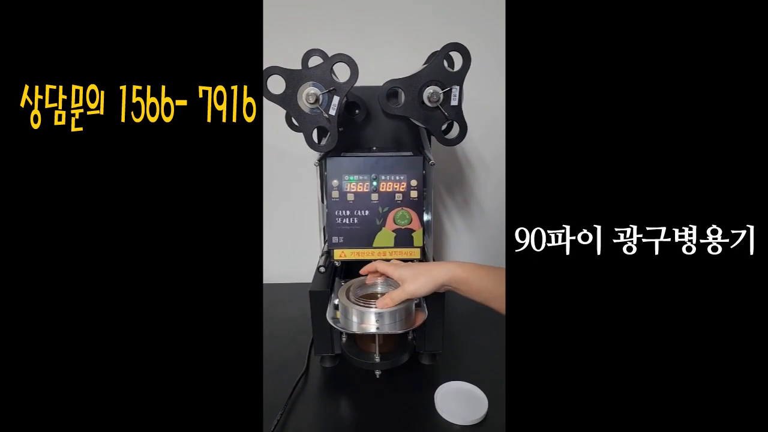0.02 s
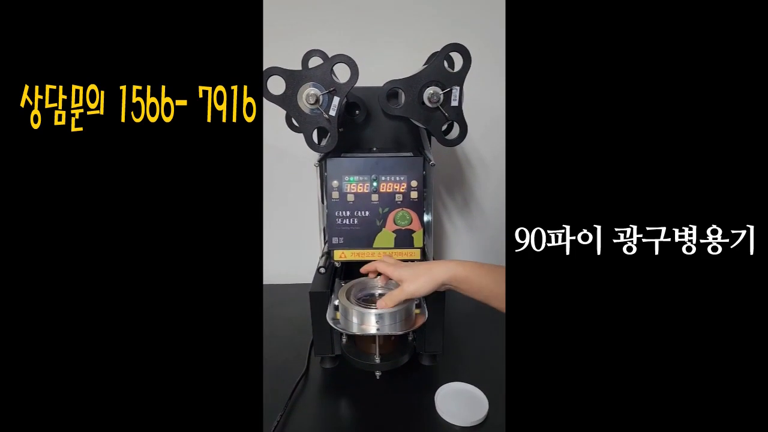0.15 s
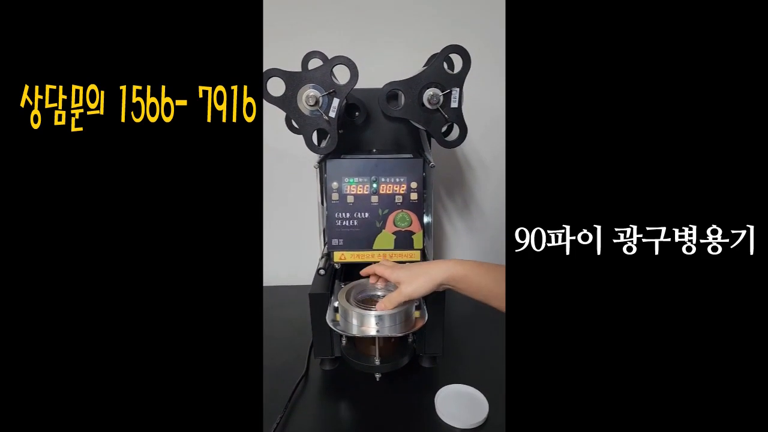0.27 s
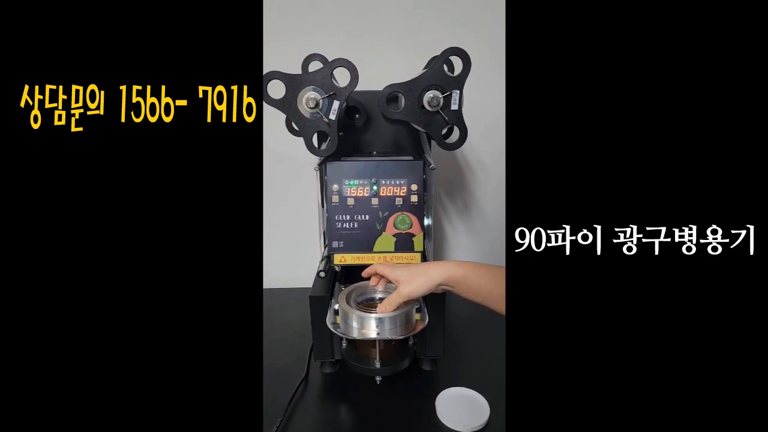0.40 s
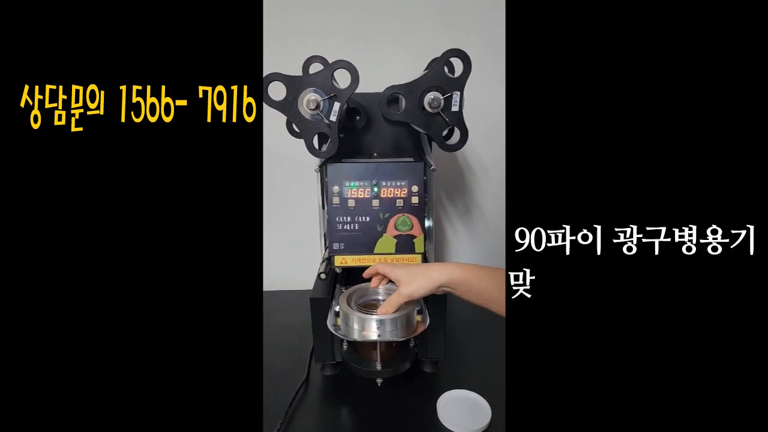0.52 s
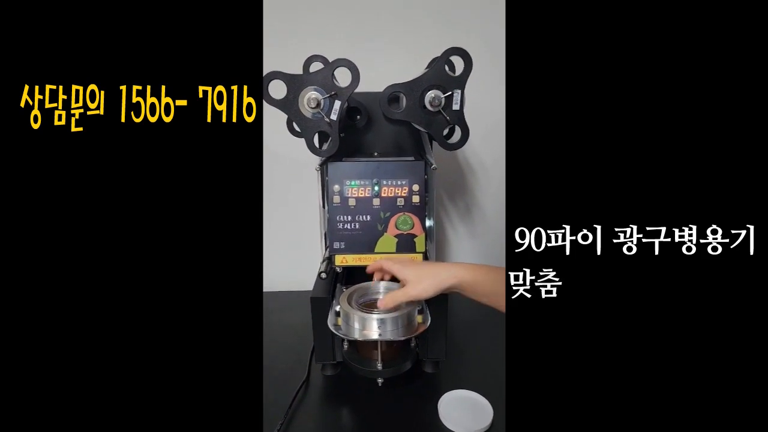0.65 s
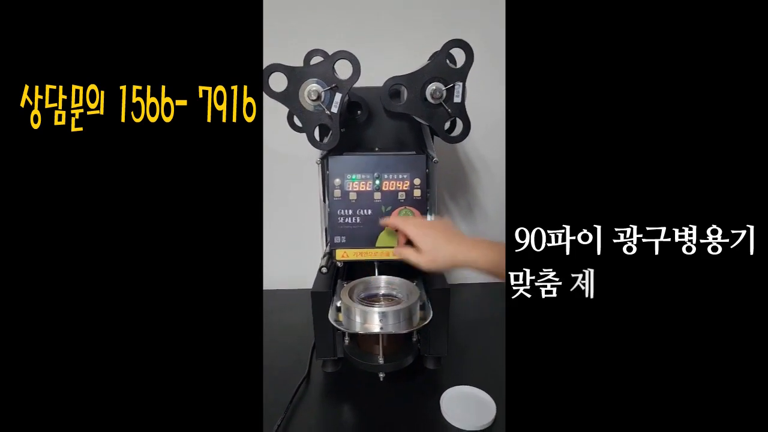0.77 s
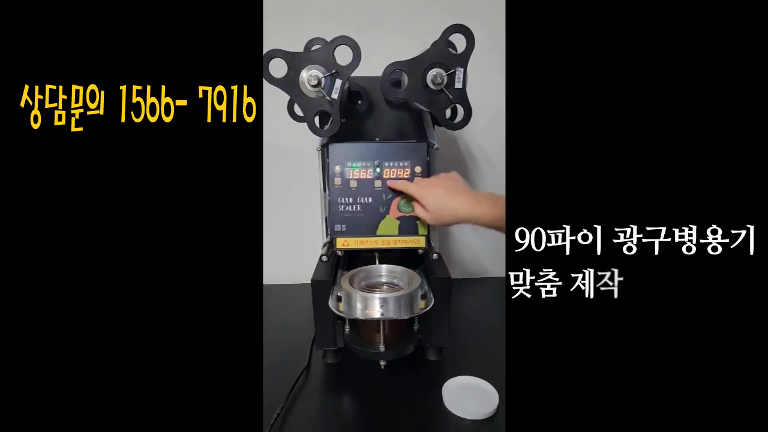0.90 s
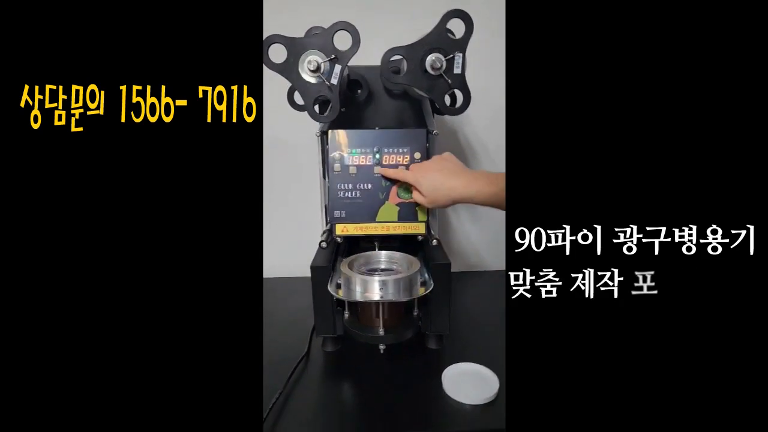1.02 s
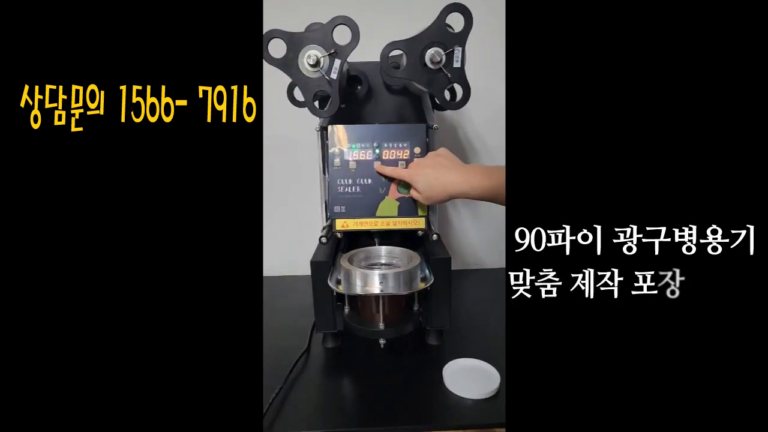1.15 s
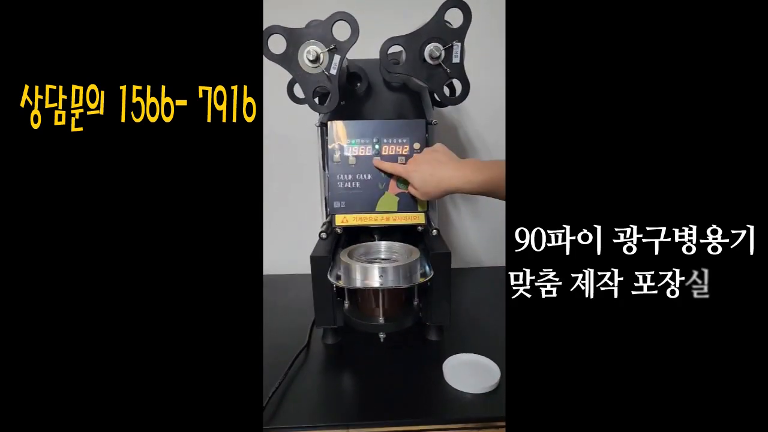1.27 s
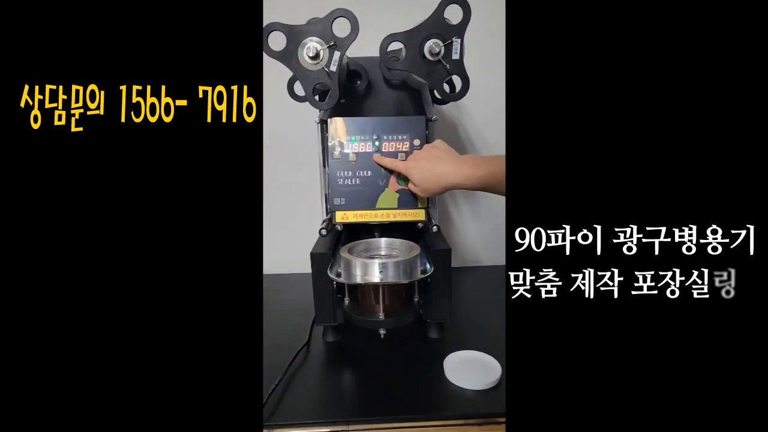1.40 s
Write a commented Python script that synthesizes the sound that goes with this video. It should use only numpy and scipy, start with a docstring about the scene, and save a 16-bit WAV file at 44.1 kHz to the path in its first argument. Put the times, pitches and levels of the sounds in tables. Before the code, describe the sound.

A jar clacks into a sealing machine's metal ring, followed by a soft rubbing hiss.

```python
"""A small room with a low hum, heard from a camera's stereo microphone by a tabletop sealing machine.
A jar is pushed into the machine's metal ring: a short scrape, a clattering clack and a thud that
leaves the frame ringing. Then a fine friction hiss swells close to the right microphone port,
probably a hand sliding on the camera body, with one dull tick."""
import sys
import numpy as np
from scipy import signal
from scipy.fft import rfft, irfft, next_fast_len
from scipy.io import wavfile
from scipy.ndimage import uniform_filter1d, map_coordinates

SR = 44100
rng = np.random.default_rng(int(sys.argv[2]) if len(sys.argv) > 2 else 0)


def inscribe(sig):
    """Save sig as 16-bit PCM at rate SR to the path in sys.argv[1].

    A 1-D sig is mono; a 2-D sig holds one channel per row.
    Samples are clipped to [-1, 1] before scaling.
    """
    pcm = np.round(np.clip(np.atleast_2d(sig).T, -1, 1) * 32767)
    wavfile.write(sys.argv[1], SR, pcm.astype(np.int16))


N = 63945

# noise of the jar striking or rubbing: f/Hz, relative level/dB
CONTACT_SPECTRUM = [(150, -15), (400, -1), (800, -2), (1550, 0), (1950, -6.5), (2700, 0), (4400, -2.5),
                    (6000, -6), (9000, -11.5), (13800, -10.5), (15000, -32)]
# likeness of left and right for sound from the room: f/Hz, correlation
ROOM_CORRELATION = [(250, 0.63), (600, 0.91), (1200, 0.13), (8000, 0.07)]


def jar_clack(crack_t60_s=0.031, crack_rise_s=0.0013):
    """The jar scrapes in and chatters against the ring; each contact cracks and rings the metal."""
    scrape = [(.184, -75), (.192, -51), (.205, -39.5), (.217, -33), (.232, -30.5), (.25, -49), (.3, -53),
              (.34, -72)]  # friction before the jar seats: t/s, relative level/dB
    contacts = [(.207, -39), (0.2206, -24), (.2255, -23), (.229, -23.5), (0.2354, -24.5), (.24, -35),
                (0.258, -31.5), (0.299, -46), (.316, -51)]  # jar against ring: t/s, relative level/dB
    ring_modes = [(716, -6, .2), (785, -5, .1), (895, -5, .2), (1196, 2, .16), (1326, -4, .15),
                  (1450, -6, .12), (1669, -7, .13), (2604, -5, .12), (3000, -4, .13), (3141, -2, .16),
                  (3310, -2, .13), (3502, -1, .17), (3654, -4, .14), (3790, -2, .14), (3949, -4, .14),
                  (4215, -1, .14), (4445, -2, .16)]  # the metal ring: f/Hz, relative level/dB, t60/s
    scraping = (since(scrape[0][0]) > 0) * (since(scrape[-1][0]) == 0)
    friction = level(scrape) * amp(1.9 * wobble(400)) * scraping
    crunch = stereo_noise(CONTACT_SPECTRUM, ROOM_CORRELATION) * friction
    metal = np.zeros((2, N))
    for start, db in contacts:
        t = since(start)
        crack = amp(db + 2 - 60 * t / crack_t60_s) * swell(t, crack_rise_s)
        crunch += stereo_noise(CONTACT_SPECTRUM, ROOM_CORRELATION) * crack
        for port in range(2):
            metal[port] += amp(db - 13) * ringing(ring_modes, t, scatter_db=2, scatter_turns=1)
    body = amp(-0.5) * crunch + amp(-1.5) * cabinet(crunch)
    return body + metal + amp(-7) * room(body + amp(-8.5) * metal)


def cabinet(x, t60_s=0.066):
    """The steel cabinet's dense, short modes colour every contact alike."""
    return reverberate(x, rng.standard_normal((2, N)) * amp(-60 * since(0) / t60_s))


def frame_thud(rise_s=0.0052):
    """The jar lands and settles; the machine's frame booms and one low mode rings on."""
    landings = [(0.097, -45), (.206, -33), (.2295, -16.5), (.256, -26.5), (.343, -33.5)]  # the jar's weight on the frame: t/s, relative level/dB
    frame_modes = [(61.3, -15, 0.37), (193.8, -6, 0.11), (204.4, -1.5, .13), (240.9, -6.5, 0.33),
                   (258.9, -25.5, 2.29), (318, -13.5, 0.14), (396, -19, 0.23), (422.4, -11.5, 0.2),
                   (479.3, -24.5, 0.39), (605.6, -15, 0.099)]  # the frame: f/Hz, relative level/dB, t60/s
    boom = sum(amp(db) * ringing(frame_modes, since(start)) * swell(since(start), rise_s)
               for start, db in landings)
    direct = high_pass(boom, hz=46)
    return direct + amp(-19.5) * room(direct)


def finger_touches(rise_s=0.0055, rub_t60_s=0.18):
    """Fingers shift the jar: a soft rub and a thin ring of glass."""
    touches = [(0.052, -66.5), (0.079, -69), (0.499, -68.5)]  # light touches: t/s, relative level/dB
    glass_modes = [(1520, -4, 0.18), (2670, -2, 0.14), (3000, -20, 0.18)]  # the jar: f/Hz, relative level/dB, t60/s
    out = np.zeros((2, N))
    for start, db in touches:
        t = since(start)
        rub = stereo_noise(CONTACT_SPECTRUM, ROOM_CORRELATION) * amp(5 - 60 * t / rub_t60_s)
        glass = ringing(glass_modes, t, scatter_db=2, scatter_turns=0.73)
        out += amp(db) * swell(t, rise_s) * (rub + glass)
    return out


def hand_slide(shift_middle_s=0.97, shift_length_s=0.62):
    """Friction hiss close to the right port changes colour as it passes, over a low handling rumble."""
    strength = [(0.479, -104, -76), (.588, -65.5, -67), (.682, -54, -52), (.806, -46, -44.5),
                (.87, -42, -43.5), (.98, -42.5, -40.5), (1.1, -40.5, -38), (1.226, -45.5, -44.5),
                (1.33, -43, -42.5), (1.45, -46.5, -46)]  # the hiss: t/s, relative level/dB right, relative level/dB left
    # hiss at the right port early and late, and at the left port: f/Hz, relative level/dB
    early_spectrum = [(60, -11), (600, -3), (1000, -8), (1650, -13.5), (2200, -8), (3000, -3.5),
                      (4100, -10.5), (5000, -6), (7000, -7), (9000, -4.5), (11700, 0.5), (13300, -1.5),
                      (14700, -4), (15400, -7)]
    late_spectrum = [(60, -10.5), (600, -4), (1300, -9), (2600, -3.5), (3800, -7), (5400, -8.5),
                     (6400, -18), (7300, -10), (8750, -2), (9400, -6), (11300, 1.5), (12200, 2.5),
                     (14000, -5), (14850, -5.5), (15350, -8)]
    left_spectrum = [(60, 5), (300, -4), (700, -1), (1750, -10), (3000, -3.5), (4800, -1.5), (5400, -0.5),
                     (7200, 1.5), (8050, -3.5), (8700, -4.5), (12000, 0.5), (15400, -3)]
    rumble_spectrum = [(25, -22), (42, -16), (58, 6.5), (85, -16), (120, 2.5), (160, -6), (220, -5),
                       (330, -22), (900, -42)]  # handling noise: f/Hz, relative level/dB
    rumble_levels = [(.62, -59), (.74, -51), (.86, -46), (.96, -58.5), (1.11, -44), (1.24, -51.5),
                     (1.33, -45.5), (1.45, -50)]  # handling noise at the right port: t/s, level/dB
    times, right_db, left_db = np.transpose(strength)
    shift = np.clip((since(0) - shift_middle_s) / shift_length_s + .5, 0, 1) * np.pi / 2
    right = np.cos(shift) * noise(early_spectrum) + np.sin(shift) * noise(late_spectrum)
    right *= level(np.c_[times, right_db + 4.5])
    left = noise(left_spectrum) * level(np.c_[times, left_db - 9])
    hiss = patchy(np.array([left, right])) * amp(0.57 * wobble(120))
    rumble = stereo_noise(rumble_spectrum, correlation=[(100, 0.52)]) * amp([[-8], [0]])
    return hiss + level(rumble_levels) * rumble


def camera_tick(low_cut_hz=336, buzz_t60_s=.085, left_db=-45):
    """A hollow tick bumps and rattles briefly in the camera body, just beside the right port."""
    ticks = [(.8517, -20.5), (.8566, -35)]  # the tick and its rattle: t/s, relative level/dB
    # modes of the camera body, and the soft bump under them: f/Hz, relative level/dB, t60/s
    case_modes = [(520, -4, .02), (736, -3.5, 0.013), (1200, 3.5, 0.0044), (1840, -20, 0.0065)]
    bump_modes = [(165, -24, .07)]
    buzz_spectrum = [(300, -35), (480, -2), (1000, -6), (1900, -4), (2800, -20), (6000, -49)]  # the rough tail: f/Hz, relative level/dB
    knock = sum(amp(db) * ringing(case_modes, since(start)) for start, db in ticks)
    knock = high_pass(high_pass(knock, low_cut_hz), low_cut_hz)
    start, db = ticks[0]
    t = since(start)
    buzz = noise(buzz_spectrum) * amp(db - 17 - 60 * t / buzz_t60_s) * (t > 0)
    bump = amp(db) * ringing(bump_modes, t)
    return (knock + buzz + bump) * amp([[left_db], [0]])


def room(x, build_s=.005):
    """The small room's reverberation builds quickly and its treble dies first."""
    decay_times = [(200, 0.78), (1000, 0.38), (3500, .36), (7000, 0.27), (14000, 0.21)]  # reverberation: f/Hz, t60/s
    hz, t, bands = signal.stft(rng.standard_normal((2, N)), SR, nperseg=256)
    decay = amp(-60 * t / along(decay_times, hz)[:, None])
    tail = signal.istft(bands * decay, SR, nperseg=256)[1][:, :N]
    return reverberate(x, spread(tail, ROOM_CORRELATION) * swell(since(0), build_s))


def room_tone(air_db=-58.5):
    """A low hum wavers in quiet room air."""
    hum_tones = [(60.5, -67), (117.5, -59)]  # the hum: f/Hz, median rms level/dB
    air_spectrum = [(25, -10), (60, -4), (90, -0.5), (170, 0.5), (280, -7.5), (430, -7.5), (700, -16),
                    (1500, -30.5), (3000, -27.5), (7000, -36), (13000, -32), (15000, -38)]  # still air: f/Hz, relative level/dB
    air_correlation = [(100, 1), (400, 0.69), (1500, 0), (8000, 0)]  # likeness of left and right: f/Hz, correlation
    hum = np.zeros(N)
    for hz, db in hum_tones:
        peak = np.sqrt(2) * amp(db + 3.4 * wobble(10.3))
        cycles = hz * since(0) + 0.034 * wobble(6.7)
        hum += peak * np.sin(2 * np.pi * cycles)
    return hum + amp(air_db) * stereo_noise(air_spectrum, air_correlation)


def ringing(modes, t, scatter_db=0, scatter_turns=0):
    """Damped modes of a struck body, with optional random level and phase."""
    chance = rng.standard_normal((len(modes), 2)) * [scatter_db, scatter_turns]
    return sum(amp(db + offset_db - 60 * t / t60) * np.sin(2 * np.pi * (hz * t + phase))
               for (hz, db, t60), (offset_db, phase) in zip(modes, chance)) * (t > 0)


def reverberate(x, tail):
    """Pass x through a stereo tail, scaled to unit energy on the left."""
    return signal.fftconvolve(np.atleast_2d(x), tail / np.linalg.norm(tail[0]), axes=1)[:, :N]


def patchy(x, depth_db=1.53):
    """Slow random shifts of colour."""
    bands = signal.stft(x, nperseg=512)[2]
    patches = uniform_filter1d(rng.standard_normal(bands.shape), size=5, axis=-2)  # across frequency
    patches = uniform_filter1d(patches, size=24, axis=-1)  # across time
    return signal.istft(bands * amp(depth_db * unit(patches)), nperseg=512)[1][..., :N]


def noise(spectrum):
    """Coloured noise of rms 1."""
    return unit(filtered(rng.standard_normal(N), lambda hz: amp(along(spectrum, hz))))


def stereo_noise(spectrum, correlation):
    """Coloured noise at both ports."""
    return spread(np.array([noise(spectrum), noise(spectrum)]), correlation)


def spread(pair, correlation):
    """Blend two unrelated signals as mid and side for a given left-right correlation."""
    angle = lambda hz: np.arccos(np.clip(along(correlation, hz), -1, 1)) / 2
    mid, side = filtered(pair, lambda hz: np.array([np.cos(angle(hz)), np.sin(angle(hz))]))
    return np.array([mid + side, mid - side])


def filtered(x, response):
    """Shape x by a gain that depends on frequency."""
    size = next_fast_len(N + 8192)
    return irfft(rfft(x, size) * response(np.fft.rfftfreq(size, 1 / SR)), size)[..., :N]


def high_pass(x, hz):
    """A second-order low cut."""
    return signal.sosfilt(signal.butter(2, hz, 'high', fs=SR, output='sos'), x)


def along(points, hz):
    """Read (f/Hz, value) points on a log frequency axis."""
    f, values = np.transpose(points)
    return np.interp(np.log(hz + 1), np.log(f + 1), values)


def level(points):
    """Gain over time from (t/s, level/dB) points."""
    return amp(np.interp(since(0), *np.transpose(points)))


def swell(t, rise_s):
    """A soft attack from zero to one."""
    return 1 - np.exp(-t / rise_s)


def wobble(rate):
    """A smooth random curve, rate knots a second."""
    return map_coordinates(rng.standard_normal(int(N * rate / SR) + 4), [np.arange(N) * rate / SR])


def since(start):
    """Seconds since a moment, zero before it."""
    return np.maximum(np.arange(N) / SR - start, 0)


def amp(db):
    """Decibels to gain."""
    return 10 ** (np.asarray(db) / 20)


def unit(x):
    """Scale to rms 1."""
    return x / np.sqrt(np.mean(x ** 2) + 1e-20)


def scene():
    """Machine, handling noise and room at the left and right ports."""
    return jar_clack() + frame_thud() + finger_touches() + hand_slide() + camera_tick() + room_tone()


def record(dry):
    """The camera keeps nothing above its band limit."""
    return filtered(dry, lambda hz: hz < 15550)


dry = scene()
out = record(dry)
inscribe(out)
```